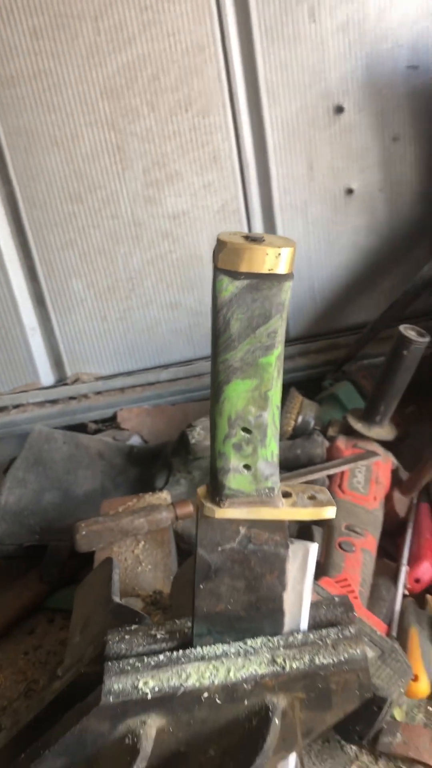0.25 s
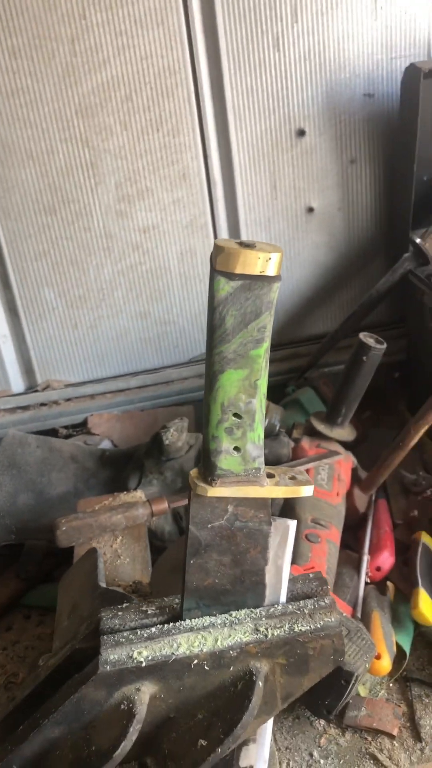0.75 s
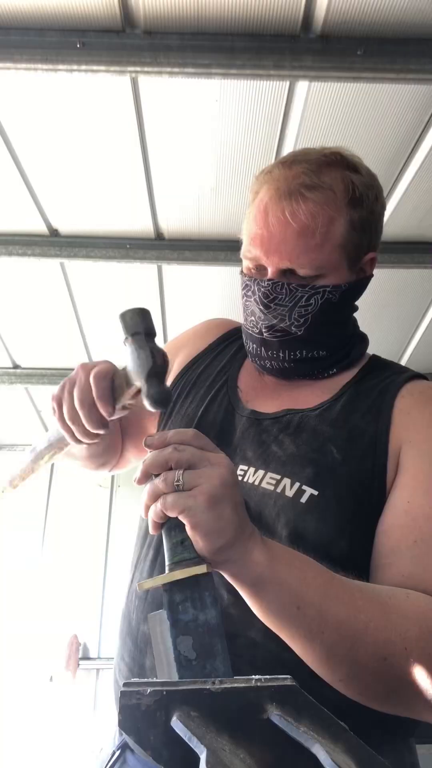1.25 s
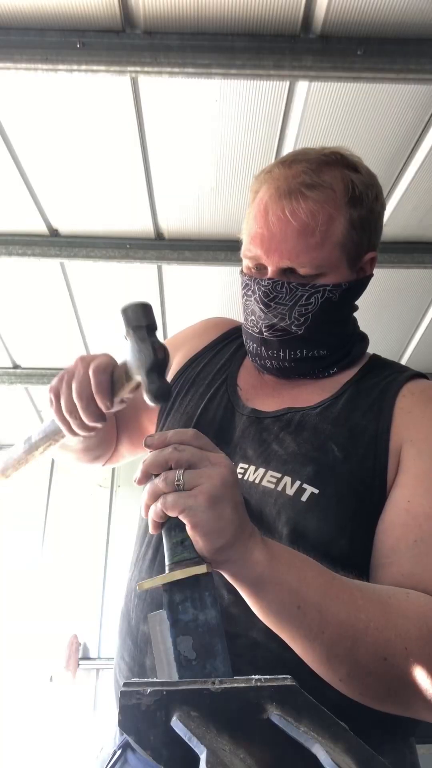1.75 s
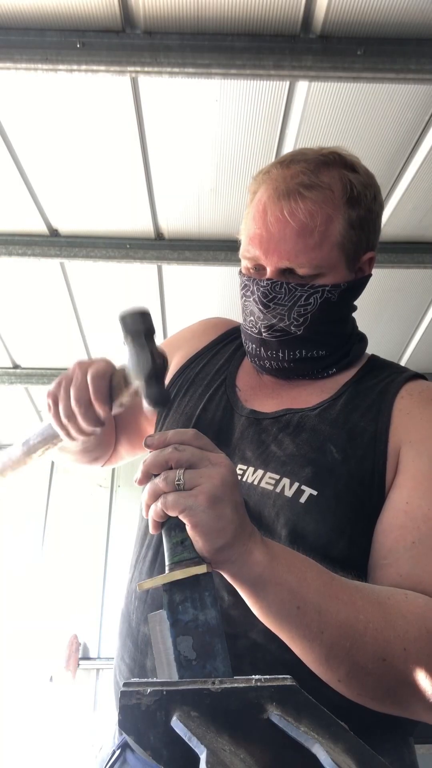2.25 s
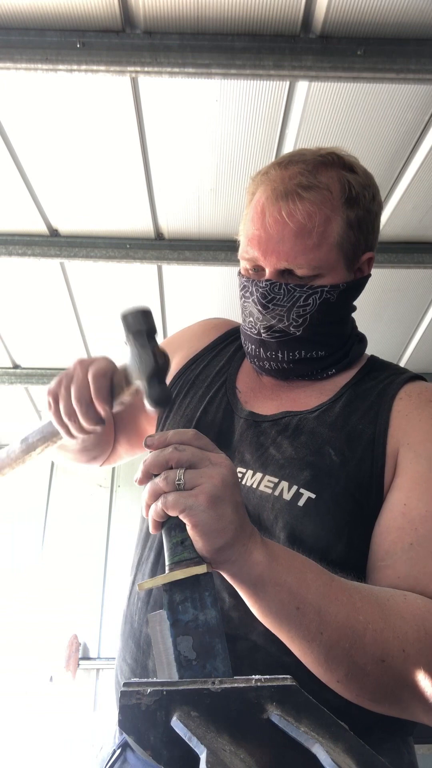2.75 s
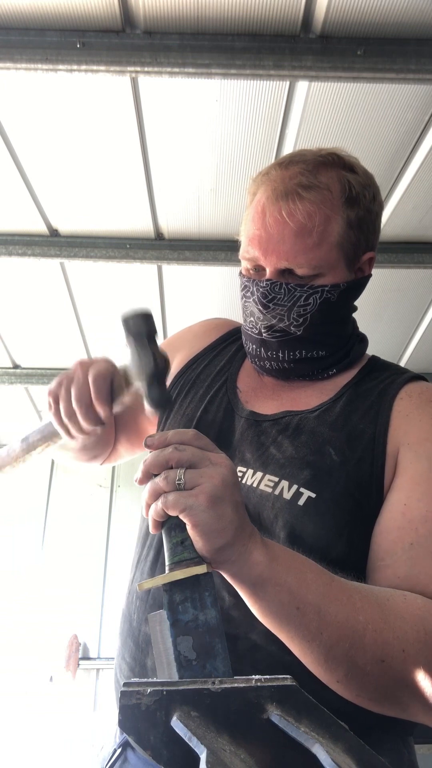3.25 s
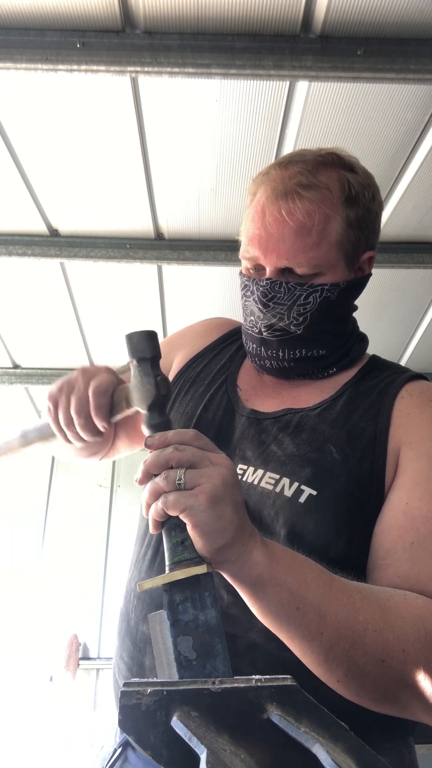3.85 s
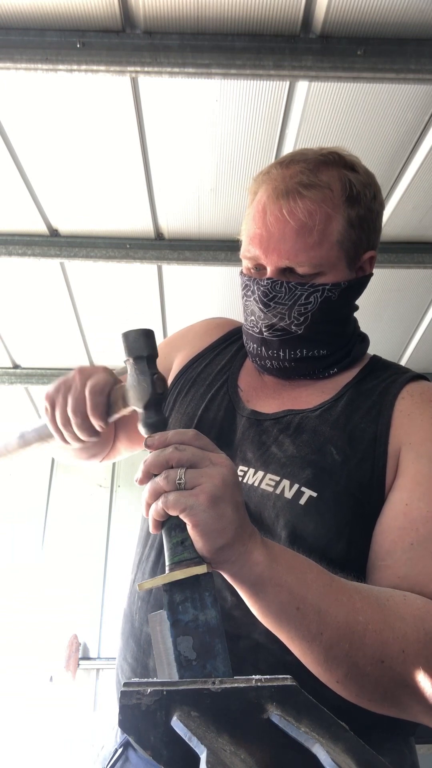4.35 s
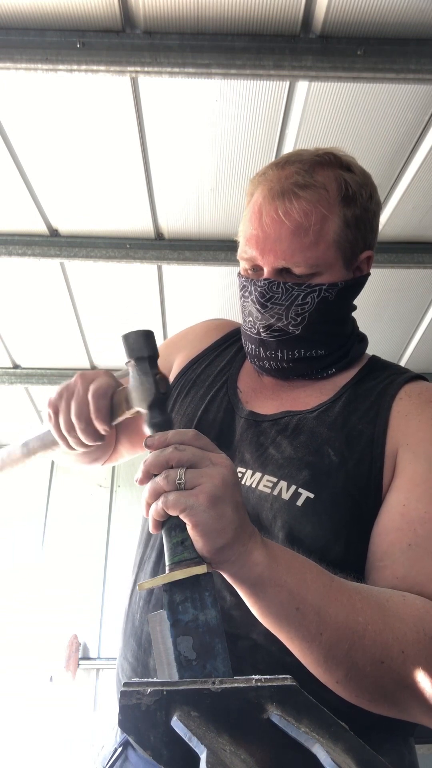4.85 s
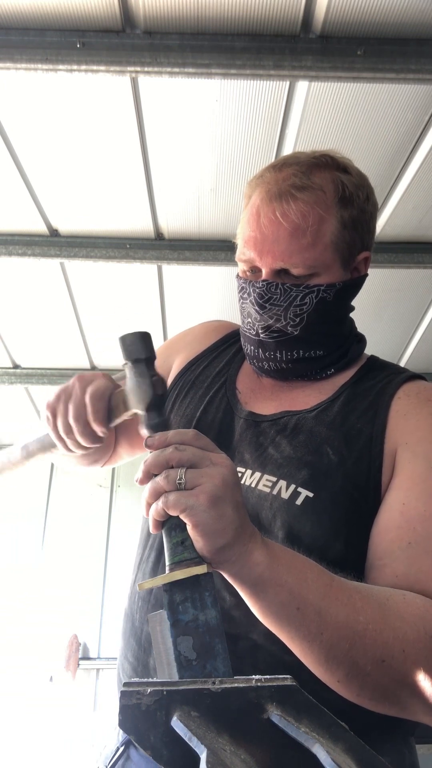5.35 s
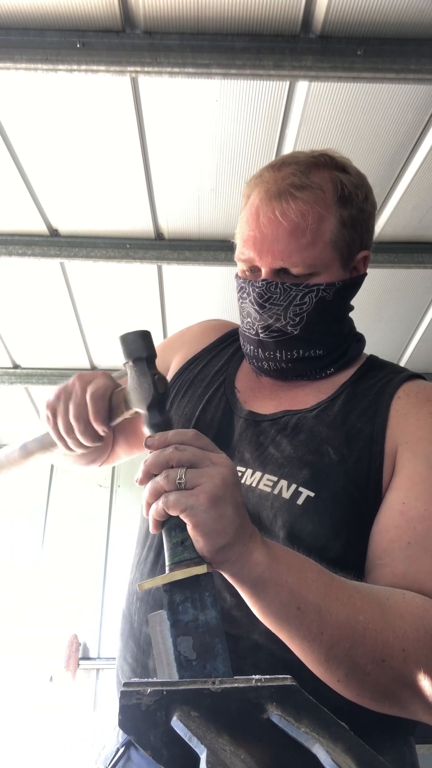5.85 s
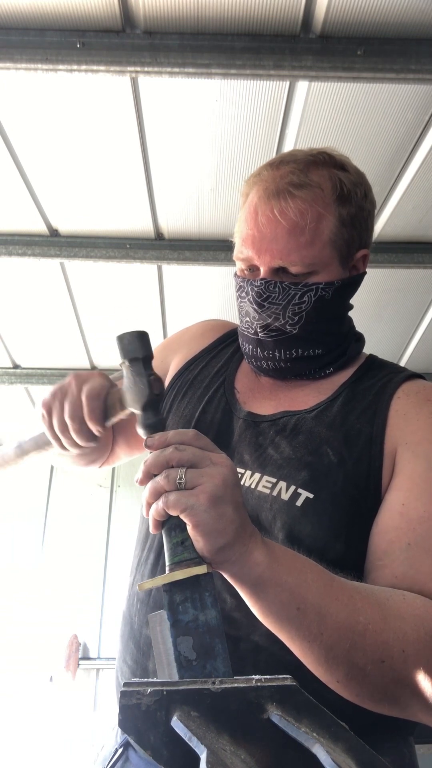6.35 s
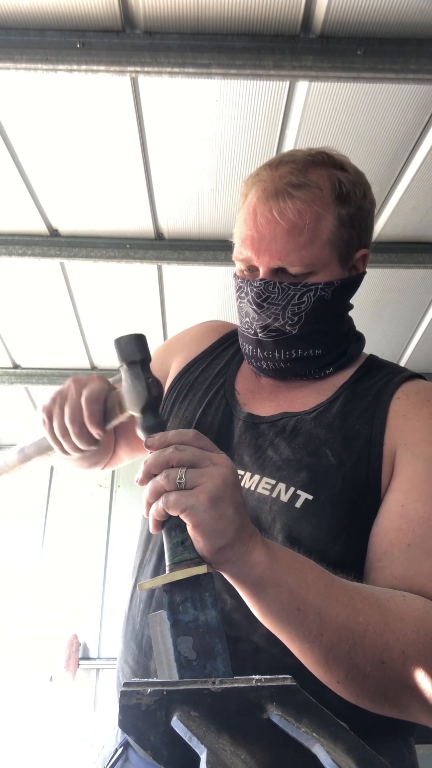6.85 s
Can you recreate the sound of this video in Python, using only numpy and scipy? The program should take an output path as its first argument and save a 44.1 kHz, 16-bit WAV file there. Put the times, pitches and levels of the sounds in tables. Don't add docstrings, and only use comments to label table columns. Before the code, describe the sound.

A quiet sheet-metal shed with soft air, a very faint high electric whine and dying metal clatter; a tool is lightly touched. Abruptly, a small hammer starts tapping a steel tang held in a vice, about four even blows a second, close to a phone. Each sharp crack and thump rings briefly, with quick wall reflections and faint rattling. Later taps are softer and brighter.

```python
import sys
import numpy as np
from scipy import signal
from scipy.fft import rfft, irfft
from scipy.io import wavfile
from scipy.ndimage import uniform_filter1d

SR = 44100
rng = np.random.default_rng(int(sys.argv[2]) if len(sys.argv) > 2 else 0)


def store_wav(level_fs):
    pcm = np.round(np.clip(np.atleast_2d(level_fs), -1, 1) * 32767)
    wavfile.write(sys.argv[1], SR, pcm.T.astype(np.int16))


def rack_gain(trim_db):
    fader = np.asarray(trim_db, float)
    return 10 ** (fader / 20)


N = 312669
SIZE = 2 ** 15
T = np.arange(SIZE) / SR
HZ = np.fft.rfftfreq(SIZE, 1 / SR) + 1e-3


def read(table, hz):
    table = np.array(table, float)
    return np.interp(np.log(hz), np.log(table[:, 0]), table[:, 1])


def unit(x):
    return x / np.sqrt(np.mean(x ** 2))


def rise(start_s, length_s):
    return np.sin(np.pi / 2 * np.clip((T - start_s) / length_s, 0, 1)) ** 2


def mode(hz, db, t60_s, delay_s=0.):
    t = np.maximum(T - delay_s, 0)
    return rack_gain(db) * np.sin(2 * np.pi * hz * t) * rack_gain(-60 * t / t60_s)


def diffuse(spectrum, t60_of, count):
    noise = rfft(rng.standard_normal((count, SIZE))) * rack_gain(read(spectrum, HZ))
    out = 0
    for hz in 30 * 2 ** np.arange(0, 9.5, .5):
        band = np.clip(1 - 2 * np.abs(np.log2(HZ / hz)), 0, 1)
        out = out + irfft(noise * band) * rack_gain(-60 * T / t60_of(hz))
    return out / np.sqrt(np.mean(out[:, :SR // 20] ** 2))


# [f/Hz, level/dB per Hz]
AIR_SPECTRUM = [(15, -52), (25, -22), (70, 1), (150, -11), (313, -4), (450, -12), (1280, -14), (2200, -20),
                (6000, -25), (8500, -32), (15200, -33), (16500, -46)]
# [t/s, level/dB]
AIR_LEVEL = [
    (0, -54),
    (.18, -58),
    (.88, -60),
    (.96, -64),
    (1.1, -64),
    (1.3, -58),
    (7.1, -58),
]


def air():
    hz = np.fft.rfftfreq(N, 1 / SR) + 1e-3
    noise = unit(irfft(rfft(rng.standard_normal(N)) * rack_gain(read(AIR_SPECTRUM, hz)), N))
    return noise * rack_gain(np.interp(np.arange(N) / SR, *np.transpose(AIR_LEVEL)))


# [f/Hz, level/dB]
WHINE_PARTIALS = [
    (8010, 0),
    (12016, -17),
]
# [t/s, level/dB]
WHINE_LEVEL = [
    (0, -78),
    (.35, -85),
    (.85, -75),
    (7.1, -76),
]


def whine():
    t = np.arange(N) / SR
    tones = sum(rack_gain(db) * np.sin(2 * np.pi * f * t) for f, db in WHINE_PARTIALS)
    return tones * np.sqrt(2) * rack_gain(np.interp(t, *np.transpose(WHINE_LEVEL)))


# [t/s, f/Hz, level/dB, t60/s]
METAL_TOUCHES = [
    (0, 1315, -61, 0.72),
    (0, 1160, -61, 0.8),
    (0, 820, -63, 1),
    (0, 322, -72, 0.94),
    (.03, 4500, -70, .3),
    (1.096, 1320, -65, 0.37),
    (1.196, 1200, -51, 0.011),
    (1.225, 1390, -60, 0.62),
]


def touches():
    out = np.zeros(N)
    for s, f, db, t60_s in METAL_TOUCHES:
        i = int(s * SR)
        detune = 1 + 0.059 * rng.standard_normal(3)
        out[i:i + SIZE] += sum(mode(f * k, db, t60_s) for k in detune)
    return out


# [f/Hz, level/dB, t60/s, delay/s]
CONTACT_MODES = [
    (2172, 3.5, 0.0069, 0.00029),
    (3697, -17, 0.06, 0.000081),
    (999, -13.5, 0.062, 0.00266),
    (323, -3, 0.023, 0.0014),
]
# [delay/s, level/dB]
BENCH_ECHOES = [
    (.0028, -39),
    (.0058, -24),
]
# [f/Hz, level/dB per Hz]
CHATTER_SPECTRUM = [(150, -38), (300, -10.5), (1000, -12), (1500, -12.5), (1900, -2.5), (2400, 2),
                    (2700, -6.5), (3900, -16), (4600, -10.5), (9800, -17.5), (12000, -24), (16500, -42)]


def contact():
    first = sum(mode(*row) for row in CONTACT_MODES)
    echoes = sum(rack_gain(db) * np.exp(-2j * np.pi * HZ * s) for s, db in BENCH_ECHOES)
    first = irfft(rfft(first) * (1 + echoes))
    noise = rfft(rng.standard_normal((4, SIZE)))
    chatter = rfft(unit(irfft(noise * rack_gain(read(CHATTER_SPECTRUM, HZ)))))
    high = 1 / (1 + (1500 / HZ) ** 4)
    crack = irfft(chatter * high) * (rack_gain(3.5) * (1 - rise(0.00066, 0.0015)) + rack_gain(-3.0 - T / 0.0012))
    thump = irfft(chatter * (1 - high)) * rise(0.00029, 0.0019) * rack_gain(6.0)
    gripped = 1 - rise(0.0066, 0.0059)
    return first * rise(0, 0.00088), rack_gain(-7.5) * (crack + thump) * gripped * rise(0, 0.00065)


HEAD_MODES_HZ = [3812, 3867, 4188, 4727, 5329, 5620, 6126, 7725, 8790, 10600]
# [level/dB, t60/s]
HEAD_DECAYS = [(-23, 0.26), (-18, 0.16), (-31.5, 0.22), (-38.5, 0.39), (-34.5, 0.26), (-24.5, 0.069),
               (-33.5, 0.2), (-60, 0.088), (-37, 0.14), (-34, 0.15)]


def head_modes():
    modes = [mode(f, *row) for f, row in zip(HEAD_MODES_HZ, HEAD_DECAYS)]
    return np.array(modes) * rise(0, 0.0028)


# [low/Hz, high/Hz]
FINE_BAND_HZ = (2600, 11500)
FINE_DB, FINE_DB_PER_OCT, FINE_T60_S, FINE_SPREAD_DB = -43, -6.5, 0.17, 6


def fine_partials():
    fine_hz = np.geomspace(*FINE_BAND_HZ, 48) * (1 + .015 * rng.standard_normal(48))
    level_db = FINE_DB + FINE_DB_PER_OCT * np.log2(fine_hz / 4000)
    modes = [mode(f, db, FINE_T60_S) for f, db in zip(fine_hz, level_db)]
    return np.array(modes) * rise(0, 0.0028)


RING_MODES_HZ = [210, 254, 300, 334, 361, 458, 700, 806, 918, 994, 1174, 1220, 1330, 1374, 1647, 1691, 1832,
                 1873, 1992, 2102, 2290, 2378, 2494, 2875]
# [level/dB, t60/s]
RING_DECAYS = [(-27.5, 1.31), (-26, 0.28), (-24, 0.5), (-7.5, 0.13), (-25, 0.29), (-17.5, 0.18),
               (-49, 0.17), (-13.5, 0.39), (-12, 0.23), (-11, 0.18), (-22, 0.25), (-14, 0.19), (-17, 0.26),
               (-12.5, 0.15), (-19, 0.2), (-5, 0.13), (-14, 0.13), (-15, 0.21), (-16.5, 0.16), (-16, 0.24),
               (-20, 0.22), (-16, 0.2), (-18, 0.16), (-19.5, 0.14)]
BLADE_HZ = 806


def ring_modes():
    rings = np.array([mode(f, *row) for f, row in zip(RING_MODES_HZ, RING_DECAYS)])
    steps = np.repeat(rng.standard_normal((len(rings), SIZE // 512)), 512, axis=1)
    clustered = np.array(RING_MODES_HZ)[:, None] > 850
    rings = rings * (1 + .7 * uniform_filter1d(steps, 512, axis=1) * clustered)
    return rack_gain(-1.5) * rings * rise(0.00054, 0.037)


# [f/Hz, level/dB per Hz]
WALL_SPECTRUM = [(18, -46), (40, -28.5), (212, -8), (732, -9.5), (814, -7.5), (1060, -6), (2340, -9),
                 (2670, -19.5), (3860, -14), (4530, -18), (10500, -26), (14800, -41), (16500, -83)]
# [f/Hz, t60/s]
WALL_DECAY = [(60, 0.79), (200, 0.51), (500, 0.31), (1100, 0.27), (2900, 0.3), (7700, 0.21), (14000, 0.19)]


def wall_echo():
    walls = diffuse(WALL_SPECTRUM, lambda hz: read(WALL_DECAY, hz), count=4)
    return rack_gain(-16.5) * walls * (rack_gain(-10.0) + rise(0.0056, 0.022)) * rise(0.0021, 0.0043)


# [f/Hz, level/dB per Hz]
RATTLE_SPECTRUM = [(18, -46), (30, 0), (248, 0), (676, -13), (835, -11.5), (1530, -19), (2160, -24),
                   (8310, -33), (14500, -55), (16500, -67.5)]


def loose_rattle():
    return rack_gain(-33.5) * diffuse(RATTLE_SPECTRUM, lambda hz: 1.2, count=4) * rise(0.012, 0.082)


# [f/Hz, level/dB, t60/s, delay/s]
BOOM_MODES = [
    (84, -26.5, 0.093, 0.0127),
    (110, -22.5, 0.11, 0.01282),
    (230.5, -16, 0.075, 0.0183),
    (332, -13, 0.049, 0.0188),
    (940, -24, 0.019, 0.023),
]


def boom():
    return sum(mode(*row) for row in BOOM_MODES)


# [t/s, crack/dB, thump/dB, brightness/dB, blade ring/dB]
EARLIER_BLOW = (1.112, -7, -13, -22, 0)
# [t/s, crack/dB, thump/dB, brightness/dB, blade ring/dB]
HAMMER_BLOWS = [(1.3606, -5, -12, -25, 2), (1.603, -6.5, -13.5, -26, 2.5), (1.856, -6, -13, -24, 2.5),
                (2.0944, -6, -13.5, -24.5, 1.5), (2.337, -5, -6.5, -29, -4), (2.591, -7.5, -13.5, -23.5, 2),
                (2.8397, -7.5, -14, -23.5, 2), (3.083, -8, -15, -24.5, 2.5),
                (3.3335, -8.5, -14, -26.5, -0.5), (3.5799, -9, -13.5, -23.5, -1),
                (3.8281, -6, -12, -24, -9), (4.0889, -9, -14.5, -24.5, 1), (4.331, -9.5, -13.5, -23, 1),
                (4.576, -8.5, -11, -27.5, -3.5), (4.8298, -10, -12, -24, -1.5), (5.0809, -7, -6.5, -23, -9),
                (5.3284, -9, -11, -21.5, -1.5), (5.5723, -9.5, -15, -22, 1.5),
                (5.8179, -10, -14.5, -22, -3), (6.0584, -11, -14, -20, -2.5),
                (6.304, -10.5, -13, -21, -6.5), (6.5545, -10.5, -12.5, -20, -6.5),
                (6.7987, -9.5, -10.5, -21.5, -9.5), (7.0392, -9, -11.5, -18.5, -4)]
# [crack/dB, thump/dB, brightness/dB]
USUAL_BLOW = (-7, -13, -22)
CUT_S, CUT_FADE_S = 1.272, .014
WET_DB, WET_PER_THUMP, WET_PER_CRACK, HEAD_DB, HEAD_PER_BRIGHT = -0.86, -0.84, -0.48, 0.7, 0.19
MIDDLE_S, LOWER_DB_PER_S, UPPER_DB_PER_S, SOFTEN_DB_PER_S = 3.17, 0.61, 2.13, -0.15
CONTACT_LOW_HZ = 222


def hammer():
    out = np.zeros(N + SIZE)
    knock, chatter = contact()
    heads, fine, rings = head_modes(), fine_partials(), ring_modes()
    walls, rattle, floor = wall_echo(), loose_rattle(), boom()
    lead = SR // 40
    for s, crack_db, thump_db, bright_db, blade_db in np.vstack([EARLIER_BLOW, HAMMER_BLOWS]):
        crack, thump, bright = np.subtract((crack_db, thump_db, bright_db), USUAL_BLOW)
        wet_db = WET_DB + WET_PER_THUMP * thump + WET_PER_CRACK * crack
        ping = HEAD_DB + HEAD_PER_BRIGHT * bright
        later_s = s - MIDDLE_S
        lower = crack + later_s * LOWER_DB_PER_S
        upper = crack + later_s * UPPER_DB_PER_S

        weights = np.r_[1, .45 * rng.standard_normal(3)]
        weights = weights / np.linalg.norm(weights)
        first = irfft(rfft(knock + weights @ chatter) / (1 + CONTACT_LOW_HZ / (1j * HZ)) ** 2)
        head = rack_gain(2.0 * rng.standard_normal(len(heads))) @ heads
        head = head + rack_gain(FINE_SPREAD_DB * rng.standard_normal(len(fine))) @ fine
        share_db = 1.94 * rng.standard_normal(len(rings))
        share_db = np.where(np.array(RING_MODES_HZ) == BLADE_HZ, blade_db, share_db)
        wet = head + rack_gain(share_db) @ rings + weights @ walls + weights @ rattle + floor
        blow = rack_gain(-1.5 + SOFTEN_DB_PER_S * later_s) * first + rack_gain(wet_db) * wet
        blow = np.roll(blow, lead)

        trace = unit(irfft(rfft(rng.standard_normal(SIZE)) * np.abs(rfft(knock)) ** 0.67))
        swell = rack_gain((T[:lead] - T[lead]) / 0.0008)
        blow[:lead] += rack_gain(-25.5 + 2.5 * rng.standard_normal()) * trace[:lead] * swell

        tone = read([(120, 0), (280, thump), (1100, thump), (1800, lower), (2400, lower),
                     (3000, upper), (3900, ping), (9500, bright)], HZ)
        tone = tone + 1.0 * read(np.c_[np.geomspace(200, 16000, 20), rng.standard_normal(20)], HZ)
        i = int((s + .0002) * SR) - lead
        out[i:i + SIZE] += rack_gain(-2.0) * irfft(rfft(blow) * rack_gain(tone))
    t = np.arange(N) / SR
    return out[:N] * np.clip((t - CUT_S) / CUT_FADE_S, 0, 1)


def scene():
    return (air() + whine() + touches() + hammer())[None]


def roll_off(x):
    return signal.sosfilt(signal.butter(12, 16650, fs=SR, output="sos"), x)


def record(dry):
    x = .9 * np.tanh(dry / .9)
    x = signal.sosfilt(signal.butter(4, 52, "high", fs=SR, output="sos"), x)
    x = signal.sosfilt(signal.ellip(8, .3, 60, 15700, fs=SR, output="sos"), x)
    return roll_off(x)


dry = scene()
out = record(dry)
store_wav(out)
```